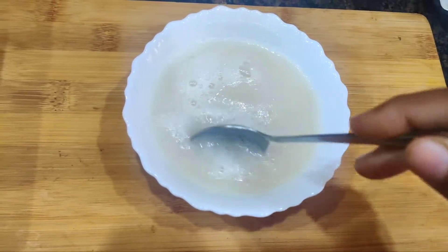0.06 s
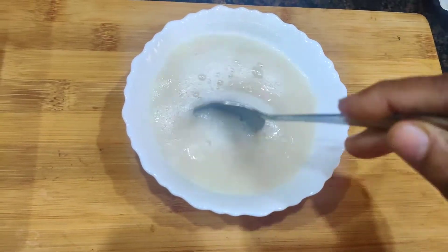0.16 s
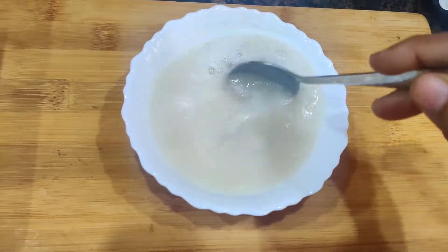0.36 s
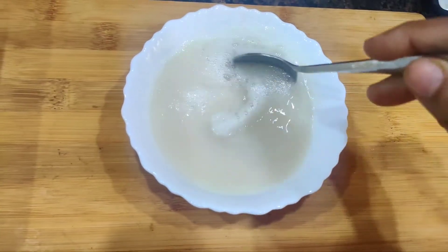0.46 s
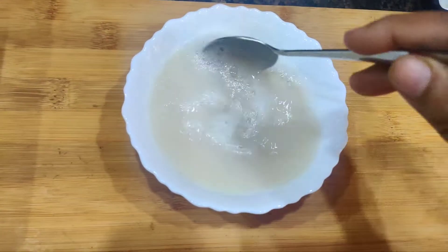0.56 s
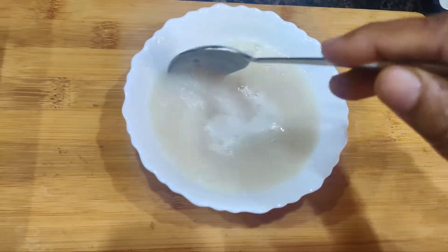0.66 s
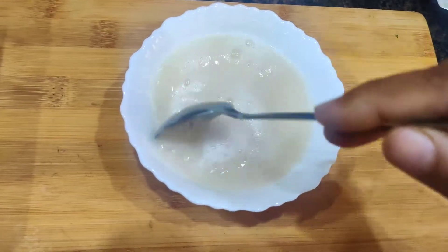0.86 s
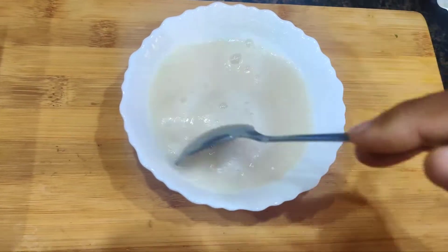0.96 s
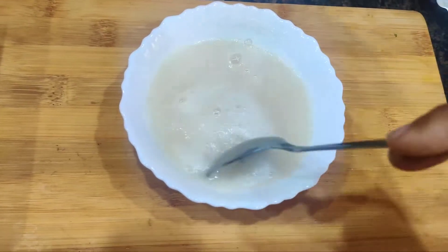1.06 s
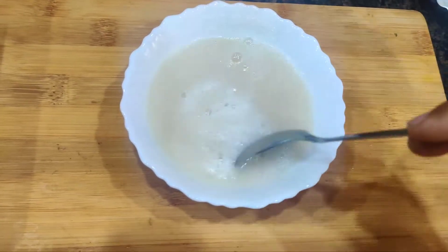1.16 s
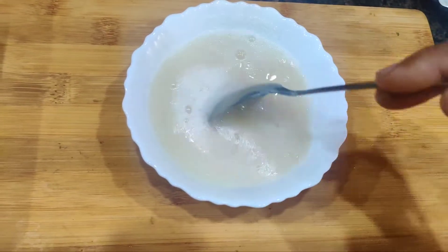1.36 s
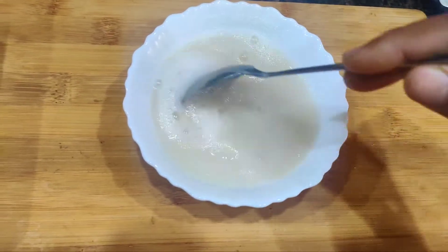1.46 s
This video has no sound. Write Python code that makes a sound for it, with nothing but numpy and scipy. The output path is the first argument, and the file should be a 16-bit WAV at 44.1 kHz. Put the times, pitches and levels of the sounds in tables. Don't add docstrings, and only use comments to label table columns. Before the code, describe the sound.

A metal spoon stirs thin batter in a ceramic bowl, heard close in stereo. After faint touches at 0.2 s, a hard, bright, quickly damped knock lands at 0.24 s with a woody thud. A small high tap follows at 0.49 s. At 0.85 s a lighter clink leads into clustered clinks, low liquid gulps and squeaky, stuttering scrapes until about 1.25 s. Quiet kitchen rumble, faint hum and hiss remain.

```python
import sys
import numpy as np
from scipy import signal
from scipy.io import wavfile

SR = 44100
rng = np.random.default_rng(int(sys.argv[2]) if len(sys.argv) > 2 else 0)


def pcm_store(signal):
    levels = np.round(np.clip(np.atleast_2d(signal), -1, 1) * 32767)
    wavfile.write(sys.argv[1], SR, levels.astype(np.int16).T)


def convert_level_to_amplitude(level_db):
    exponent = np.asarray(level_db, float) / 20
    return 10 ** exponent


N = 66150
LEAD = SR // 4
M = N + LEAD

# frequency in Hz, level in dB per Hz.
RUMBLE = [(12, -27), (20, 4), (65, -7), (92, -9.5), (288, -16), (356, -15), (418, -13), (499, -18),
          (1400, -27), (1820, -61), (3080, -120)]
# frequency in Hz, level in dB per Hz.
HISS = [(1400, 0), (2500, -2), (3600, -3.5), (5200, -0.5), (7000, -9), (9000, -5), (11000, -13.5),
        (16000, -7.5)]
# frequency in Hz, correlation 0 to 1.
LIKENESS = [(30, .95), (100, .95), (250, .75), (500, .45), (1000, .2), (3000, .05), (15000, .01)]
# frequency in Hz, width in Hz, level in dB, fade time in seconds.
FRIDGE = [
    (102, 4, -72, 1.6),
    (213, 5, -77, .95),
    (296, 5, -83, 1.01),
    (426, 6, -81, .95),
]
# frequency in Hz, t60 in seconds.
KITCHEN_T60 = [(300, 0.45), (1000, 0.58), (2500, 0.53), (6000, 0.29), (10000, 1), (15000, 0.44)]
# frequency in Hz, gain in dB.
LEFT_PORT = [(300, 4), (1500, -14), (2400, 1), (6000, 5.5), (7300, -10), (8500, -27.5), (11000, -32),
             (15000, -5)]
RIGHT_PORT = [(300, 1.5), (1500, 3.5), (2400, -15.5), (6000, -12.5), (7300, -10.5), (8500, 6.5), (11000, 0),
              (15000, 14.5)]

# start in seconds, level in dB, rise in seconds, t60 in seconds.
JOLTS = [
    (-.03, -51, 0.002, 0.13),
    (0.2363, -49.5, .003, 0.27),
    (0.844, -56, 0.0035, 0.14),
    (0.886, -61.5, .03, 0.31),
]
# frequency in Hz, level in dB per Hz.
BOARD = [(100, -16.5), (200, -7.5), (450, -0.54), (800, -4), (1200, -10), (1800, -8)]
# start in seconds, level in dB, start pitch in Hz, rise per second, t60 in seconds.
GULPS = [
    (.905, -53, 290, 0.43, 0.098),
    (.915, -51, 159, 0.53, 0.076),
    (0.39, -59, 470, 0.47, .1),
    (.27, -60.5, 230, .6, .08),
    (.925, -56, 390, .5, .12),
    (.89, -59, 600, .5, .1),
    (.94, -56, 200, .4, .12),
    (.69, -57, 285, .4, .09),
]
# start in seconds, level in dB, pitch in Hz, rise per
# second, t60 in seconds.
BOARD_RINGS = [
    (.2385, -42, 1200, 0, .03),
    (.2385, -49, 1000, 0, .03),
    (.4925, -60, 1592, 0, .03),
    (.846, -60, 1620, 0, .03),
    (.488, -60, 300, 0, .05),
]

# start in seconds, level in dB, quick t60 in seconds,
# slow part in dB, slow t60 in seconds.
HAZES = [
    (-.09, -44.5, .05, -15.5, 0.22),
    (.2390, -39.5, 0.041, -17.5, .3),
    (.8452, -56, 0.035, -6, 0.18),
    (.4935, -67.5, 0.014, -3, 0.3),
]
# frequency in Hz, level in dB.
HAZE_COLOUR = [(1900, -4), (3000, -1.5), (4300, -4), (6300, -3), (7500, -18), (9200, -4.5), (11500, -16),
               (15000, -40.5)]

# time in seconds, level in dB.
DRAG = [(0, -99.5), (0.159, -98), (0.209, -77.5), (.25, -98), (.84, -91.5), (0.882, -74.5), (.93, -81.5),
        (.95, -82), (1.0, -79), (1.05, -82), (1.147, -81), (1.19, -91.5), (1.248, -87.5), (1.3, -90.5),
        (1.38, -94.5), (1.42, -85), (1.5, -100)]
# start in seconds, length in seconds, level in dB, pitch in Hz, upper rings in dB.
SKIDS = [(0.894, 0.023, -49.5, 2626, -30), (.9200, 0.013, -61, 2590, -1), (0.959, .02, -64, 2640, -5),
         (1.0290, 0.002, -53, 2680, -8.5), (1.035, .003, -56, 2800, -7), (1.038, 0.0046, -61, 2720, -10),
         (1.0545, 0.0019, -60.5, 2800, -10), (1.0745, 0.00074, -48.5, 2580, -2.5),
         (1.077, 0.0056, -57, 2325, -3), (1.089, 0.0018, -57, 2730, -5), (1.0930, 0.0023, -44, 2760, -16),
         (1.0960, 0.0034, -53, 2670, -8), (1.1010, 0.0021, -51, 2310, -18),
         (1.1100, 0.0035, -57, 2590, -12), (1.12, 0.0044, -55.5, 2740, -8), (1.1290, .005, -62, 2340, -10),
         (1.1420, 0.0041, -55.5, 2720, -19), (1.2023, 0.0028, -48.5, 2600, -20),
         (1.2025, 0.0017, -61.5, 3760, -36), (1.2040, 0.0087, -49.5, 2246, -24),
         (1.211, .003, -60, 3300, -25), (1.2194, 0.0012, -60, 2550, -22), (1.2300, 0.0037, -62, 2720, -32),
         (1.2334, 0.0012, -62, 2860, -16), (1.24, .002, -62.5, 2730, -10),
         (1.251, 0.0016, -62.5, 2460, -27), (1.409, 0.017, -82, 2500, 14),
         (0.492, 0.0032, -38.5, 2254, -43)]
# frequency in Hz, level in dB.
SKID_TOPS = [(3500, -5.5), (4780, -4), (5600, -9.5), (6000, -23), (7250, 0), (8950, -3.5), (10200, -6.5)]

# start in seconds, peak in dB, brightness in dB per octave.
KNOCKS = [
    (-.09, -16, -5),
    (.2382, -9, -6),
]
# start in seconds, peak in dB, pitch of main ring in Hz,
CLINKS = [
    (.2034, -47, 2100, -21, -11),
    (.2155, -60, 2490, -4, -28.5),
    (.8560, -56, 2630, -12, -9),
    (.8755, -66, 2630, 8, -12),
    (.8449, -36.5, 2630, -1, 10),
    (.8945, -51.5, 2695, 0.5, 9),
    (.9000, -50, 2630, -1, 1.5),
    (.9088, -49.5, 2630, 0.5, 2.5),
]
# start in seconds, peak in dB, brightness in dB per octave, ring share in dB.
TAPS = [
    (.4920, -49.5, 0, -4),
    (.4940, -42.5, -5, 3),
]
# frequency in Hz, level in dB, t60 in seconds.
WALL = [(1834, -1.5, .03), (2254, -7, 0.044), (2399, -4, 0.03), (2616, -4.5, 0.035), (3395, -6, .04),
        (3890, -2, .03), (4110, -7.5, 0.03), (4743, 2, .035), (5370, -5, .035), (5589, -3.5, 0.03),
        (5990, -3, 0.035), (6297, -7.5, .03), (9130, -3, .03), (9380, 6, .025)]
BASE = [(2630, -3, 0.055), (2760, -13, .03), (2580, -10, .05), (4760, -9, 0.042), (4780, -6, 0.046),
        (5550, -6, .03), (5800, -12.5, .035), (6063, -8, .035), (7120, -5, 0.13), (7400, -8, .045),
        (7420, -9.5, .04), (9300, -18.5, .03), (9100, -17.5, 0.023), (10100, -22, .02)]
RIM = [(2502, -4.5, 0.097), (2800, -0.5, 0.012), (3242, -4.5, 0.018), (3715, -12, 0.01), (3960, -18, .012),
       (5457, -6, .016), (5700, -12, .02), (6100, -22, 0.017), (9100, -7.5, 0.013)]
# frequency in Hz, level in dB.
CRACK = [(1750, -25.5), (2400, 3), (3700, -11.5), (4800, -3.5), (6200, -4.5), (9200, -13), (11000, -24),
         (15500, -44.5)]
TICK = [(2000, -29.5), (2500, -1), (3500, -7.5), (4300, -16.5), (5800, -3), (9200, -16), (11000, -25),
        (14000, -39.5)]


def rms_one(x):
    return x / np.sqrt(np.mean(x ** 2) + 1e-20)


def at_hz(points, hz):
    table_hz, value = np.transpose(points)
    return np.interp(np.log(hz), np.log(table_hz), value)


def bands(octaves):
    edges = 20 * 2 ** np.arange(0, 9.8, octaves)
    return [(signal.butter(2, [low, high], "band", fs=SR, output="sos"), np.sqrt(low * high))
            for low, high in zip(edges, edges[1:])]


def stereo_noise(spectrum, low_hz, high_hz):
    out, white = 0, rng.standard_normal((2, 2, M))
    for k, (sos, hz) in enumerate(bands(1 / 3)):
        if low_hz < hz < high_hz:
            mid, side = signal.sosfilt(sos, white[k % 2])
            alike = np.clip(at_hz(LIKENESS, hz), 0, 1)
            pair = np.sqrt(1 + alike) * mid + np.sqrt(1 - alike) * side * [[1], [-1]]
            out = out + convert_level_to_amplitude(at_hz(spectrum, hz)) * pair
    return rms_one(out)


def room_tone():
    rumble = convert_level_to_amplitude(-64.5) * stereo_noise(RUMBLE, 20, 1400)
    hiss = convert_level_to_amplitude(-74) * stereo_noise(HISS, 1400, 20000)
    out = rumble + hiss
    t = (np.arange(M) - LEAD) / SR
    for hz, wide_hz, db, until in FRIDGE:
        r = np.exp(-np.pi * wide_hz / SR)
        resonator = [1, -2 * r * np.cos(2 * np.pi * hz / SR), r * r]
        waver = rms_one(signal.lfilter([1], resonator, rng.standard_normal(M)))
        fade = 1 + np.exp((t - until) / 0.048)
        out = out + convert_level_to_amplitude(db) * (waver + np.sin(2 * np.pi * hz * t)) / fade
    return out


def kitchen(x):
    t = np.arange(SR // 2) / SR
    white = rng.standard_normal((2, 2, len(t)))
    early = convert_level_to_amplitude(13.5 - 60 * t / 0.052)
    echo = 0
    for k, (sos, hz) in enumerate(bands(0.98)):
        tail = convert_level_to_amplitude(-60 * t / at_hz(KITCHEN_T60, hz))
        echo = echo + signal.sosfilt(sos, white[k % 2]) * (tail + early)
    onset_s = 0.002
    echo = echo * (1 - np.exp(-(t / onset_s) ** 2)) / np.sqrt(SR / 20)
    return convert_level_to_amplitude(-18) * signal.fftconvolve(x, echo, axes=1)[:, :M]


def board():
    t = (np.arange(M) - LEAD) / SR
    shape = 0
    for s, db, rise, t60 in JOLTS:
        since = np.maximum(t - s, 0)
        shape = shape + convert_level_to_amplitude(db - 60 * since / t60) * (1 - np.exp(-since / rise))
    return shape * stereo_noise(BOARD, 90, 1900)


def liquid():
    out, t = np.zeros(M), np.arange(SR // 5) / SR
    for s, db, hz, rise, t60 in GULPS + BOARD_RINGS:
        i = int(s * SR) + LEAD
        shape = convert_level_to_amplitude(db - 60 * t / t60) * (1 - np.exp(-t * hz / 1.2))
        out[i:i + len(t)] += shape * np.sin(2 * np.pi * hz * (t + rise * t * t / 2))
    return out


def ports(hz):
    return convert_level_to_amplitude(np.array([at_hz(LEFT_PORT, hz), at_hz(RIGHT_PORT, hz)]))


def add_rings(out, s, hz, db, shape, start, phase):
    t = np.arange(shape.shape[-1]) / SR
    i = int(s * SR) + LEAD
    for c in range(2):
        wave = np.sin(2 * np.pi * hz[:, None] * t + (start + c * phase)[:, None])
        gain = (ports(hz)[c] * convert_level_to_amplitude(db))[:, None]
        out[c, i:i + len(t)] += (gain * shape * wave).sum(axis=0)


def haze():
    out, t = np.zeros((2, M)), np.arange(SR // 5) / SR
    luck = rng.random((6, 4, 240))
    rise, end = np.minimum(t / .001, 1), 1 - (t / t[-1]) ** 4
    for (s, db, t60, slow_db, slow_t60), (place, level, start, phase) in zip(HAZES, luck):
        hz = 1850 + 13500 * (np.arange(len(place)) + place) / len(place)
        decay = convert_level_to_amplitude(-60 * t / t60) + convert_level_to_amplitude(slow_db - 60 * t / slow_t60)
        level_db = db + at_hz(HAZE_COLOUR, hz) + 8 * level - 13.5
        add_rings(out, s, hz, level_db, (rise * decay * end)[None], 2 * np.pi * start, 1.8 * (phase - .5))
    return out


def spoon_drag():
    s, db = np.transpose(DRAG)
    push = convert_level_to_amplitude(np.interp((np.arange(M) - LEAD) / SR, s, db))
    out = np.zeros((2, M))
    born = rng.random(M) < 3200 / SR
    spread_db = 4 * np.minimum(rng.exponential(1, M), 4)
    size = convert_level_to_amplitude(spread_db) * born * push
    for hz, level_db, t60 in BASE + [(2425, -1, 0.074)]:
        r, w = convert_level_to_amplitude(-60 / (0.21 * t60 * SR)), 2 * np.pi * hz / SR
        resonator = [1, -2 * r * np.cos(w), r * r]
        ring = signal.lfilter([0, np.sin(w)], resonator, size * rng.standard_normal(M) + 1e-18)
        out += convert_level_to_amplitude(level_db) * ports(hz)[:, None] * ring
    return out


def spoon_skids():
    rise_s, stop_t60_s, ring_t60_s = 0.0005, 0.013, 0.028
    spread, side_db = 0.062, -8.5
    out, t = np.zeros((2, M)), np.arange(SR // 16) / SR
    luck = rng.standard_normal((40, 4, 10))
    top_hz, top_db = np.transpose(SKID_TOPS)
    for (s, length, db, pitch_hz, upper_db), (detune, level, start, phase) in zip(SKIDS, luck):
        beside_hz = pitch_hz * (1 + spread * (np.array([-1, 1]) + .3 * detune[1:3]))
        hz = np.r_[pitch_hz, beside_hz, top_hz * (1 + .015 * detune[3:])]
        is_other = np.arange(len(hz)) > 0
        level_db = db + np.r_[0, side_db, side_db, top_db + upper_db] + 2.5 * level * is_other
        held = (1 - np.exp(-t / rise_s)) * convert_level_to_amplitude(-60 * np.maximum(t - length, 0) / stop_t60_s)
        shape = held * np.where(is_other[:, None], convert_level_to_amplitude(-60 * t / ring_t60_s), 1)
        add_rings(out, s, hz, level_db, shape, np.pi * start, 1.2 * phase)
    return out


def touch(out, s, db, tilt_db, hold, crack, modes, ring_db, luck):
    crack_t60_s = 0.0021
    after_db, after_t60_s = -18, 0.014
    hz = np.linspace(1500, 15800, num=100) + 60 * luck[0]
    t = np.arange(SR // 20) / SR
    rise, late = np.minimum(t / 0.00025, 1), np.maximum(t - hold, 0)
    tilt = tilt_db * np.log2(np.minimum(hz, 9000) / 2600)
    level_db = db - 10 + at_hz(crack, hz) + tilt + 2 * luck[1]
    shape = rise * (convert_level_to_amplitude(-60 * late / crack_t60_s) + convert_level_to_amplitude(after_db - 60 * late / after_t60_s))
    add_rings(out, s, hz, level_db, shape, np.pi * luck[5], 0.8 * luck[2])

    hz, mode_db, t60 = modes
    n = len(hz)
    t = np.arange(SR // 6) / SR
    level_db = db + ring_db + mode_db + tilt_db * np.log2(hz / 2600) + luck[3, :n]
    shape = np.minimum(t / 0.00044, 1) * convert_level_to_amplitude(-60 * t / t60[:, None])
    add_rings(out, s, hz, level_db, shape, np.pi * luck[6, :n], 3.4 * luck[4, :n])


def spoon_hits():
    knock_hold_s, clink_hold_s = 0.0016, 0.0014
    out = np.zeros((2, M))
    luck = rng.standard_normal((30, 7, 100))
    for k, (s, db, tilt_db) in enumerate(KNOCKS):
        touch(out, s, db, tilt_db, knock_hold_s, CRACK, np.transpose(WALL), -14, luck[k])
    hz, level_db, t60 = np.transpose(BASE)
    for k, (s, db, pitch_hz, tilt_db, ring_db) in enumerate(CLINKS):
        shift = pitch_hz / hz[0]
        tick = np.array(TICK) * [shift, 1]
        modes = (hz * shift, level_db, t60)
        touch(out, s, db, tilt_db, clink_hold_s, tick, modes, ring_db - 5.5, luck[-1 - k])
    for k, (s, db, tilt_db, ring_db) in enumerate(TAPS):
        touch(out, s, db, tilt_db, clink_hold_s, TICK, np.transpose(RIM), ring_db, luck[len(KNOCKS) + k])
    above = signal.sosfilt(signal.butter(8, 1850, "high", fs=SR, output="sos"), out)
    return above + convert_level_to_amplitude(-22) * out


def scene():
    bowl = spoon_hits() + spoon_drag() + liquid() + board()
    tone = room_tone()
    bowl = bowl + spoon_skids() + haze()
    into_room = 0.92 * bowl + 0.087 * bowl[::-1]
    return (bowl + kitchen(into_room) + tone)[:, LEAD:]


def roll_off(x):
    return signal.sosfilt(signal.butter(12, 16440, fs=SR, output="sos"), x)


def record(dry):
    soft = signal.sosfilt(signal.butter(6, 14800, fs=SR, output="sos"), dry)
    mix = signal.sosfilt(signal.cheby2(8, 22, 15900, fs=SR, output="sos"), soft)
    return roll_off(mix)


dry = scene()
out = record(dry)
pcm_store(out)
```